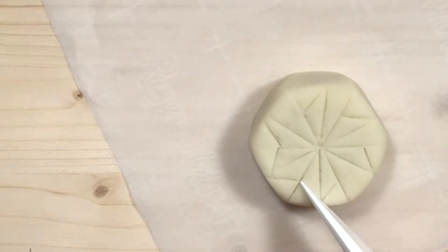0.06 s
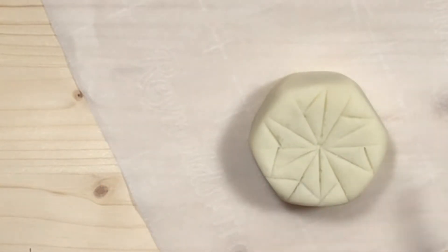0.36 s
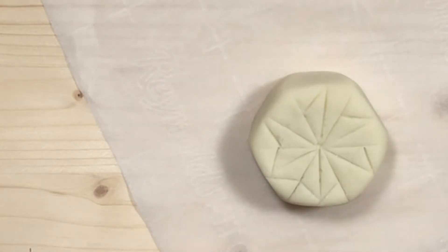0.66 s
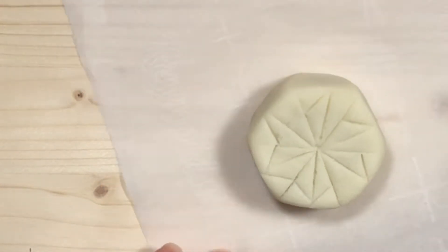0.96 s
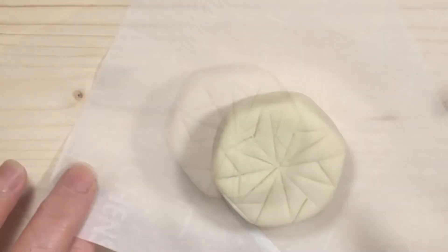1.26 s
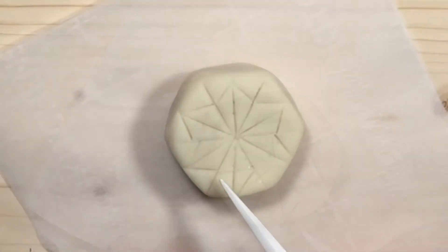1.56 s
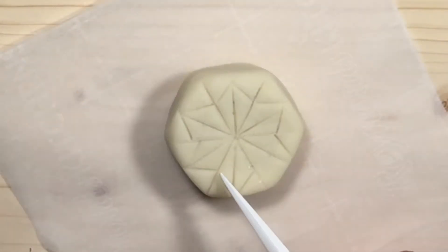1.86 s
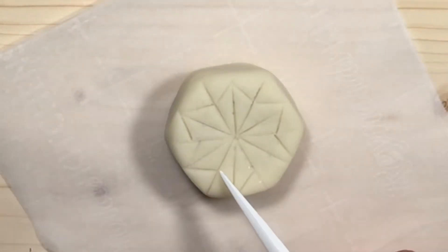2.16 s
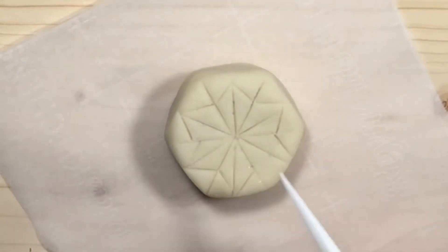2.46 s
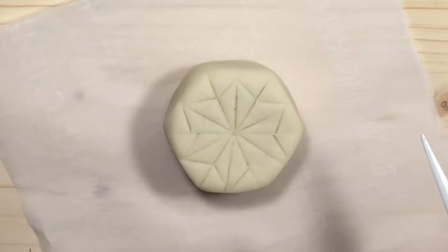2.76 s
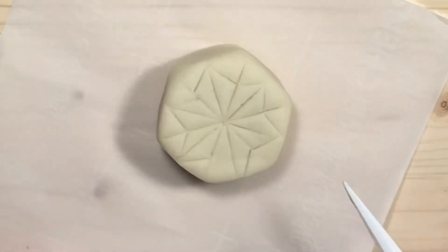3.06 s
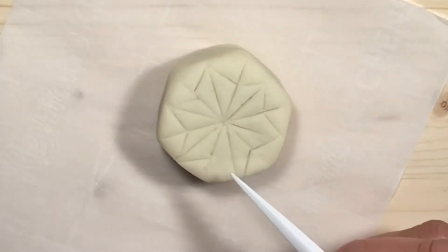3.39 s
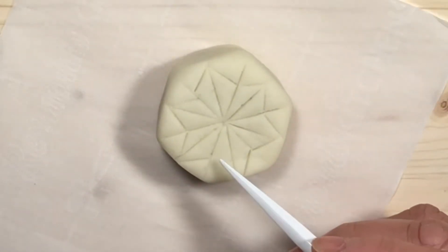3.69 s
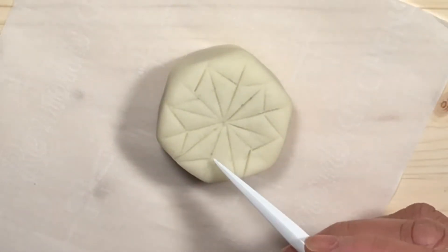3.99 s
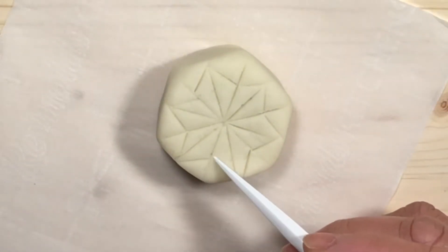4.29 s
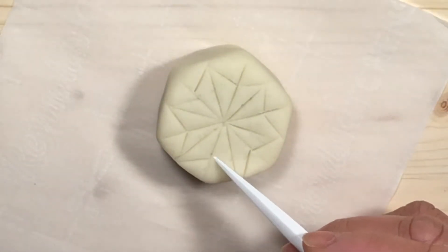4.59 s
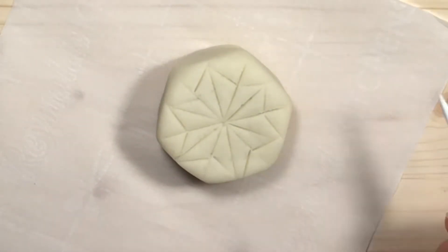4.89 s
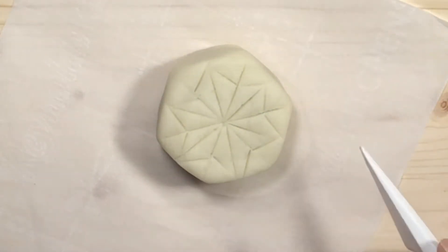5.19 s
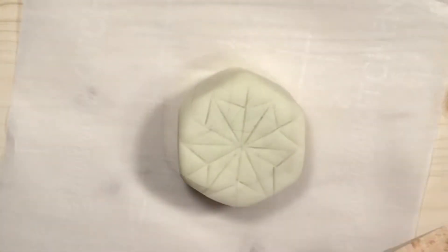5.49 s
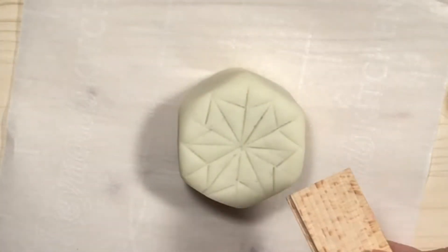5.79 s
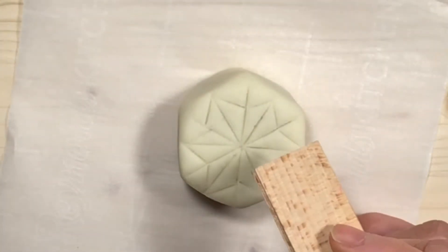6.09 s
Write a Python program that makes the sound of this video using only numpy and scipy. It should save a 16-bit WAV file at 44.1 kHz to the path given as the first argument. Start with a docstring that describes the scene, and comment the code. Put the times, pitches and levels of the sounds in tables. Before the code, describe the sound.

Soft, grainy scrapes and small paper ticks come and go as paste is shaped on baking paper, over a quiet kitchen hum.

```python
"""Baking paper rubs on a wooden board as a pointed tool works a soft bean-paste sweet lying on it.
Fingers press the sheet and drag it round. Stick-slip friction makes each stroke a fine, grainy hiss
over a coarser rasp, coloured by the resonances of sheet and board; the paper ticks as it flexes and
rings briefly where it catches. Nearby surfaces reflect these sounds. A close two-port microphone
also hears the low rumble and hum of a quiet kitchen, and a slow draft."""
import sys
import numpy as np
from scipy import signal
from scipy.fft import rfft, irfft, next_fast_len
from scipy.io import wavfile
from scipy.ndimage import uniform_filter1d

SR = 44100
rng = np.random.default_rng(int(sys.argv[2]) if len(sys.argv) > 2 else 0)


def log_audio(samples):
    """Write samples as a 16-bit WAV file to the path given in sys.argv[1]."""
    # one column per channel
    frames = np.atleast_2d(samples).T
    # limit to full scale, then quantise
    limited = np.clip(frames, -1, 1)
    pcm = np.round(limited * 32767).astype(np.int16)
    wavfile.write(sys.argv[1], SR, pcm)


N = 275368
SIZE = next_fast_len(N, real=True)
HZ = np.fft.rfftfreq(SIZE, 1 / SR)
TIME = np.arange(N) / SR

# Spectrum of the kitchen noise: f/Hz, relative level/dB
ROOM_SPECTRUM = [(20, 18.5), (30, 9.5), (42, 12.5), (60, 1), (110, 7.5), (150, 2.5), (190, 1.5), (290, -3),
                 (430, -6.5), (670, -9.5), (1100, -12), (2500, -18.5), (6200, -22), (15500, -22.5)]
# Its imbalance between the ports: f/Hz, left minus right/dB
ROOM_BALANCE = [(25, 11), (70, 15), (140, -2.5), (300, -5.5), (900, -6), (4000, -1.5)]
# Low hums: f/Hz, bandwidth/Hz, relative level/dB
HUMS = [(88.5, 12.4, -5.5), (137.5, 24, -3)]
# Coherence of the ports, for room noise and for near sources: f/Hz, shared fraction of power
ROOM_COHERENCE = [(30, 0.84), (130, 0.3), (600, 0.53), (1300, 0.086), (2500, 0.0091), (15000, 0.024)]
NEAR_COHERENCE = [(100, 0.9), (700, 0.92), (2000, 0.89), (3300, 0.8), (4800, 0.43), (6500, 0.45),
                  (9000, 0.32), (15000, 0)]
# Reflections from nearby surfaces: left delay/s, right delay/s, level/dB
ECHOES = [(.00155, 0.0015, -32), (.0031, 0.0037, -15), (.0047, .00475, -22), (.0078, 0.0058, -21.5)]
# Resonances of sheet and board: f/Hz, bandwidth/Hz, boost/dB
BODY_MODES = [(516, 75, 3.5), (1280, 200, 2), (1950, 430, 2.5), (2340, 92, 5), (2780, 110, 2.5),
              (3400, 160, 1.5), (4900, 290, 2), (6310, 180, 2), (8560, 280, 2.5)]
# Friction spectra of fingertips, coarse slips and fine slips: f/Hz, relative level/dB
FINGER_SPECTRUM = [(40, -29), (130, 6), (250, -3), (500, -5), (800, -6.5), (1300, -10), (3000, -32),
                   (8000, -55)]
RASP_SPECTRUM = [(200, -8.5), (500, 1.5), (800, -6), (1200, 1.5), (2200, -3), (3500, -3.5), (5500, -14),
                 (10000, -42)]
HISS_SPECTRUM = [(300, -36), (1500, -21), (3500, -7), (5500, -4), (7500, -2), (10000, 1.5), (12000, 1.5),
                 (14000, -1.5), (16000, -10.5)]
# Fingers bearing down on the board: t/s, hold/s, relative level/dB
PRESSES = [(0.333, .012, -47.5), (0.373, 0.035, -39), (0.422, 0.12, -47), (0.554, 0.075, -54),
           (0.744, 0.024, -47), (0.809, 0.0075, -41.5), (0.9, 0.19, -57)]
# Catches of the rub: t/s, attack/s, hold/s, release/s, first f/Hz, last f/Hz, bandwidth/Hz, level/dB
CATCHES = [(0.552, 0.01, 0.049, 0.062, 417, 470, 300, -47.5),
           (0.81, 0.01, 0.0074, 0.0051, 3050, 3350, 950, -31.5),
           (0.897, 0.014, 0.081, 0.089, 1260, 1570, 1000, -51),
           (0.945, 0.068, 0.062, 0.15, 4680, 6750, 1500, -41),
           (2.334, 0.024, 0.0099, 0.019, 1930, 2040, 600, -53.5),
           (2.622, 0.028, 0.028, 0.06, 2200, 2600, 1000, -50.5),
           (2.798, 0.069, 0.066, 0.058, 5500, 4700, 1500, -48),
           (2.84, .04, 0.043, .04, 3800, 3300, 1400, -50.5),
           (2.958, 0.018, 0.009, 0.01, 3600, 3300, 1200, -44.5),
           (3.19, 0.086, 0.11, 0.065, 1370, 1310, 350, -59.5),
           (4.572, 0.038, 0.017, 0.033, 1300, 1290, 199, -60),
           (4.69, 0.072, 0.13, 0.1, 1330, 1270, 330, -57.5),
           (5.14, 0.054, .015, 0.14, 4430, 5300, 1900, -52.5)]
# Ticks of the paper: t/s, peak level/dB, f/Hz, half-width/octaves, rattle T60/s, left minus right/dB,
# relative level of the board's knock/dB
TICKS = [(0.3771, -33.5, 1120, 1.9, 0.14, 4, -26), (0.4600, -30, 6460, 2.3, 0.02, 1, -25),
         (0.470, -28, 10600, 1.3, 0.11, 0, -25), (0.477, -35, 8000, 1.7, .012, 8, -25),
         (0.7499, -21.5, 3800, 0.74, 0.017, 1, 0.5), (0.771, -26.5, 2900, 1.6, 0.017, 0, -10),
         (0.777, -25, 3200, 1.2, 0.012, 0, -18), (0.8055, -25, 3800, 1.3, 0.012, 1, -20),
         (0.8116, -22, 3320, 1.3, 0.017, -2, -22), (0.8252, -21.5, 3440, 0.73, 0.008, 1, -9),
         (0.838, -27.5, 2800, 1, 0.021, 0, -22), (1.0113, -23, 1010, 0.98, 0.0071, 0.5, -33),
         (1.0127, -20, 3900, 0.54, 0.0057, 3, -28), (1.109, -18, 10000, 0.6, .002, -5, -33),
         (1.2318, -26.5, 5070, 2.7, 0.034, -.5, -20), (1.282, -37, 1270, 1.9, 0.029, -3, -25),
         (2.5945, -27.5, 2680, 2.2, 0.0085, 0, -18), (2.714, -26, 4300, 1, 0.006, 0, -20),
         (3.001, -33, 2800, 1.1, .01, 0, -12), (3.311, -34.5, 1890, 1.5, 0.013, -2, -20),
         (3.33, -34, 5200, 0.94, 0.013, 0, -20), (3.3383, -20, 4200, 2, 0.005, -9, -14),
         (3.3526, -31, 6200, 1, .012, 0, 0), (3.3575, -15, 5700, 1.6, 0.013, 2, 0.5),
         (3.4099, -24.5, 2000, 2.2, 0.012, 0, -9), (4.7992, -17, 5200, 1.1, 0.0083, 3, -3.5),
         (5.4028, -21.5, 3370, 0.85, 0.012, 0, 0)]
# Brief brushes: peak t/s, time to half amplitude/s, relative hiss level/dB, relative rasp level/dB,
# left port's phase lead at 12 kHz/rad
BRUSHES = [(0.114, 0.037, -55.5, -54, 6), (0.24, 0.072, -63.5, -65.5, 4), (0.415, 0.039, -59, -49, -5),
           (0.822, 0.01, -43, -41, -3), (1.367, 0.02, -49, -61, 9.5), (2.351, 0.038, -47.5, -54.5, 6),
           (2.541, 0.012, -45.5, -48, 3), (2.598, 0.025, -48.5, -57, -3), (4.607, 0.033, -50.5, -52, -4.5),
           (4.707, 0.029, -50.5, -52.5, 6.5), (5.112, 0.014, -46, -66, -1), (5.569, 0.038, -63, -53, 9),
           (5.691, 0.009, -55, -68, 2.5), (5.927, 0.1, -59.5, -66, 0)]
# Sustained drags: t/s, attack/s, hold/s, release/s, relative hiss level/dB, relative rasp level/dB,
# hiss swell over the hold/dB, tilt above 5 kHz/(dB/octave), factor on the resonance boosts,
# left port's phase lead at 12 kHz/rad
DRAGS = [(0.443, 0.039, 0.32, 0.042, -48, -47.5, 6, -7.5, 0.33, -2),
         (0.797, 0.093, 0.23, 0.14, -31.5, -48, 2.5, -0.8, 0.23, 1.5),
         (1.228, 0.022, 0.22, 0.15, -56, -65, 8, -7, 0.22, 5.5),
         (2.322, 0.073, 0.11, 0.076, -54.5, -62.5, 8.5, -4.5, 2.7, 3.5),
         (2.589, 0.077, 0.05, 0.12, -37, -48, -5, -2, 0.41, -3.5),
         (2.743, 0.076, 0.13, 0.11, -37, -48.5, -5.5, 0, 0.29, -5),
         (3.008, 0.034, 0.23, 0.099, -50, -56.5, 1, -4.5, 0.38, -6),
         (3.201, 0.11, 0.086, 0.12, -52, -52, 7.5, -5, 1.3, 4),
         (4.687, 0.13, 0.051, 0.13, -48, -51.5, -4, -6.5, 1.5, 10),
         (4.978, 0.031, 0.066, 0.097, -62.5, -59, 4, -4, 2.1, 1),
         (5.121, 0.087, 0.21, 0.13, -45, -58, 1, -1.5, 2.2, 2),
         (5.439, 0.066, 0.22, 0.12, -52, -63.5, -5, -0.5, 0.89, 3.5)]


def amp(db):
    """Amplitude ratio of a level in decibels."""
    return 10 ** (np.asarray(db) / 20)


def unit(x):
    """Normalisation to an rms of 1."""
    return x / np.sqrt(np.mean(x ** 2) + 1e-20)


def curve(points, hz=HZ):
    """Interpolation on a logarithmic frequency axis."""
    f, value = np.transpose(points)
    return np.interp(np.log(hz + 1), np.log(f + 1), value)


def lorentzian(offset, width):
    """Resonance curve of height 1 and the given full width at half height."""
    return 1 / (1 + (2 * offset / width) ** 2)


def body_db(hz=HZ):
    """Modal response of the sheet on the board: each resonance lifts one band."""
    return sum(db * lorentzian(hz - f, width) for f, width, db in BODY_MODES)


def ports(spectra, coherence):
    """Partial coherence: left and right each mix a shared spectrum with one of their own."""
    return np.sqrt(coherence) * spectra[0] + np.sqrt(1 - coherence) * spectra[1:]


def flutter(rate_hz):
    """Random modulation: low-passed noise of rms 1."""
    return unit(irfft(rfft(rng.standard_normal(SIZE)) / (1 + (HZ / rate_hz) ** 2), SIZE)[:N])


def envelope(start, attack, hold, release, fall_db=22):
    """Amplitude of a rub: linear rise, hold, then a steepening decay, fall_db down after the release."""
    rise = np.clip((TIME - start) / attack, 0, 1)
    late = np.clip((TIME - start - attack - hold) / release, 0, 4)
    return rise * amp(-fall_db * late ** 1.4)


def slips(per_s, spread_db, smooth):
    """Stick-slip excitation: left and right spectra of uneven random impulses over a smooth rub."""
    strength = amp(spread_db * np.minimum(rng.exponential(1, N), 4))
    slipping = rng.random(N) < per_s / SR
    clicks = unit(strength * slipping * rng.choice([-1, 1], (3, N)))
    rub = smooth * rng.standard_normal((3, N))
    return ports(rfft(clicks + rub, SIZE), curve(NEAR_COHERENCE))


def friction(excitation, colour_db, lead=0):
    """Source and filter: slips take on a spectrum; a lead parts the ports' phases in the treble."""
    pair = excitation * amp(colour_db)
    pair[1] *= np.exp(-1j * lead * (HZ / 12000) ** 2)
    return unit(irfft(pair, SIZE)[:, :N])


def kitchen(noise_db=-49, hum_db=-57.5, wander_db=3, hum_pan_db=3.5):
    """Ambient noise: steady broadband rumble and faint hiss, with two wavering narrow-band hums."""
    sides = np.array([[.5], [-.5]])
    noise = ports(rfft(rng.standard_normal((3, SIZE))), curve(ROOM_COHERENCE))
    colour = amp(curve(ROOM_SPECTRUM) + sides * curve(ROOM_BALANCE)) * (HZ > 15)
    rumble = unit(irfft(noise * colour, SIZE)) * amp(noise_db)
    hum_noise = ports(rfft(rng.standard_normal((3, SIZE))), coherence=1.0)
    hums = sum(amp(db) * unit(irfft(hum_noise * lorentzian(HZ - f, width), SIZE))
               for f, width, db in HUMS)
    hum_gain = amp(hum_db + wander_db * flutter(rate_hz=0.94) + sides * hum_pan_db)
    return rumble[:, :N] + hums[:, :N] * hum_gain


def draft(left_db=-35, right_drop_db=18, sway_hz=6.2, width_hz=5):
    """Infrasonic pressure fluctuation: air sways against the microphone, mostly at the left port."""
    band = 1 / (1 + (2 * (HZ - sway_hz) / width_hz) ** 4)
    sway = irfft(rfft(rng.standard_normal(SIZE)) * band, SIZE)[:N]
    return unit(sway) * amp([[left_db], [left_db - right_drop_db]])


def reflections(x, t60=0.16, tail_db=-19):
    """Convolution with the room's response: early echoes and a faint, exponentially decaying tail."""
    t = TIME[:SR // 2]
    response = rng.standard_normal((2, len(t))) * amp(-60 * t / t60) * (t > .004)
    response *= amp(tail_db) / np.linalg.norm(response[0])
    for left_s, right_s, db in ECHOES:
        response[[0, 1], [round(left_s * SR), round(right_s * SR)]] += amp(db)
    return signal.fftconvolve(x, response, axes=1)[:, :N]


def fingers(gain_db=-3.0, attack_s=0.0057, release_s=0.034):
    """Forced vibration: fingertips judder on the paper and drive the board in a dull rub."""
    force = sum(amp(db + gain_db) * envelope(start, attack_s, hold, release_s)
                for start, hold, db in PRESSES)
    judder = slips(per_s=700, spread_db=1.0, smooth=0.68)
    return friction(judder, curve(FINGER_SPECTRUM) + body_db()) * force


def catches(size=512):
    """Swept resonance: where the rub catches, slips excite one gliding mode of the taut sheet."""
    grit = irfft(slips(per_s=2400, spread_db=2, smooth=.9), SIZE)[:, :N]
    hz, t, frames = signal.stft(grit, SR, nperseg=size)
    out = np.zeros((2, N))
    for start, attack, hold, release, first_hz, last_hz, width, db in CATCHES:
        centre_hz = np.interp(t, [start, start + attack + hold + release], [first_hz, last_hz])
        mode = lorentzian(hz[:, None] - centre_hz, width)
        mode /= np.linalg.norm(mode, axis=0)
        ring = signal.istft(frames * mode, SR, nperseg=size)[1][:, :N]
        out += unit(ring) * envelope(start, attack, hold, release) * amp(db)
    return out


def ticks(rattle_gain=0.32, rise_s=.0005, patch_db=5, knock_hz=1590, size=8192):
    """Transient excitation: a snap and brief rattle ring the flexed patch of paper and the board."""
    t, hz = np.arange(size) / SR, np.fft.rfftfreq(size, 1 / SR)
    out = np.zeros((2, N + size))
    for start_s, db, centre_hz, octaves, t60, pan_db, knock_db in TICKS:
        rattle_shape = np.minimum(t / rise_s, 1) * amp(-60 * t / t60)
        rattle = rattle_gain * rng.standard_normal((3, size)) * rattle_shape
        excitation = 1 + ports(rfft(rattle), curve(NEAR_COHERENCE, hz))  # 1: the snap's flat spectrum
        octaves_off = np.log2((hz + 20) / centre_hz)
        resonances = amp(body_db(hz) / 2 + patch_db * lorentzian(octaves_off, width=.2))
        paper = resonances * lorentzian(octaves_off, 4 * octaves) ** 3
        board = amp(knock_db) * lorentzian(np.log2((hz + 20) / knock_hz), width=1.3) ** 2
        # Minimum phase makes the ringing follow the snap.
        log_gain = np.log(paper + board)
        mirrored = np.r_[log_gain, log_gain[-2:0:-1]]
        response = np.exp(np.conj(signal.hilbert(mirrored)))[:len(hz)]
        tick = irfft(excitation * response, size)
        gain = amp([[db + pan_db / 2], [db - pan_db / 2]])
        start = int(start_s * SR)
        out[:, start:start + size] += tick / abs(tick).max() * gain
    return out[:, :N]


def crackle(moves, gain_db=-7, centre_hz=3400, octaves=1.4, speed_share=0.24):
    """Shot noise: coarser fibres let go now and then, louder with each stroke's pressure and speed."""
    grit = slips(per_s=240, spread_db=1.5, smooth=0)
    band_db = -20 * np.log10(1 + (np.log2((HZ + 20) / centre_hz) / octaves) ** 4)
    power = sum((speed ** speed_share * pressure ** (1 - speed_share)) ** 2
                for speed, pressure, *_ in moves)
    return friction(grit, body_db() + band_db) * np.sqrt(power) * amp(gain_db)


def bending(x, ripple_db=1.9, ripple_hz=300, ripple_s=.06, size=1024):
    """Time-varying filtering: the bending sheet's resonances drift as a random spectral ripple."""
    hz, t, frames = signal.stft(x, SR, nperseg=size)
    ripple = rng.standard_normal(frames.shape[1:])
    for axis, span in [(0, ripple_hz / hz[1]), (1, ripple_s / t[1])] * 2:
        ripple = uniform_filter1d(ripple, round(span), axis)
    gain = unit(amp(ripple_db * unit(ripple)))
    return signal.istft(frames * gain, SR, nperseg=size)[1][:, :N]


def gestures(easing=0.11, brush_tilt_db=-2.5, brush_ring=1.2):
    """Speed and pressure envelopes of each drag and brush, with its tilt, resonance factor and lead."""
    moves = []
    for start, attack, hold, release, hiss_db, rasp_db, swell_db, tilt_db, ring, lead in DRAGS:
        shape = envelope(start, attack, hold, release)
        speed_db = swell_db * (np.clip((TIME - start - attack) / hold, 0, 1) - .5)
        speed = shape * amp(hiss_db + speed_db)
        pressure = shape * amp(rasp_db - easing * speed_db)  # faster paper rides lighter
        moves.append((speed, pressure, tilt_db, ring, lead))
    for peak_s, half_s, hiss_db, rasp_db, lead in BRUSHES:
        shape = .5 ** np.minimum(((TIME - peak_s) / half_s) ** 2, 20)
        moves.append((shape * amp(hiss_db), shape * amp(rasp_db), brush_tilt_db, brush_ring, lead))
    return moves


def strokes(moves, hiss_db=-1.65, rasp_db=-3.0, hiss_flutter_db=1.42, rasp_flutter_db=1.5):
    """Sliding friction: fine slips hiss with speed, coarse ones rasp with pressure."""
    fine = slips(per_s=6000, spread_db=2.3, smooth=.9)
    coarse = slips(per_s=1200, spread_db=2.5, smooth=1.0)
    pull = flutter(rate_hz=18.0)  # one uneven pull modulates both
    hiss_gain = amp(hiss_db + hiss_flutter_db * pull)
    rasp_gain = amp(rasp_db + rasp_flutter_db * pull)
    body, hiss, rasp = body_db(), curve(HISS_SPECTRUM), curve(RASP_SPECTRUM)
    treble_octaves = np.log2(np.maximum(HZ / 5000, 1))
    out = np.zeros((2, N))
    for speed, pressure, tilt_db, ring, lead in moves:
        out += friction(fine, hiss + ring * body + tilt_db * treble_octaves, lead) * speed * hiss_gain
        out += friction(coarse, rasp + ring * body, lead) * pressure * rasp_gain
    return out


def scene():
    """Superposition of the direct sound from the board, its reflections and the background."""
    moves = gestures()
    direct = bending(strokes(moves) + crackle(moves)) + catches() + fingers() + ticks()
    return direct + reflections(direct) + kitchen() + draft()


def record(dry, cutoff_hz=15900):
    """Band limiting by a linear-phase low-pass filter."""
    lowpass = signal.firwin(511, cutoff_hz, window=("kaiser", 9), fs=SR)
    return signal.oaconvolve(dry, lowpass[None], "same")


dry = scene()
out = record(dry)
log_audio(out)
```